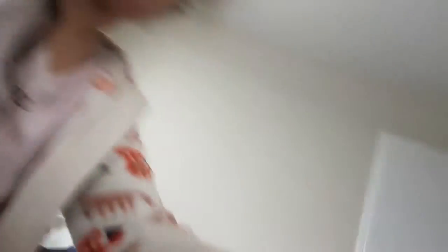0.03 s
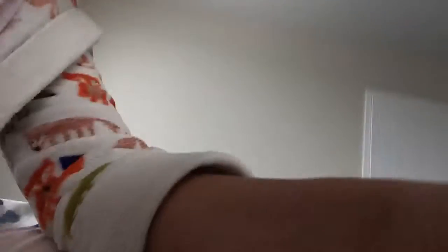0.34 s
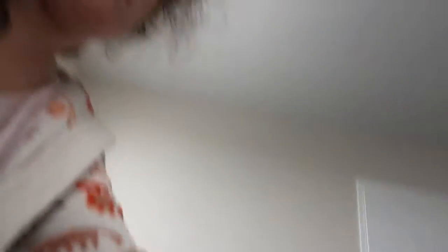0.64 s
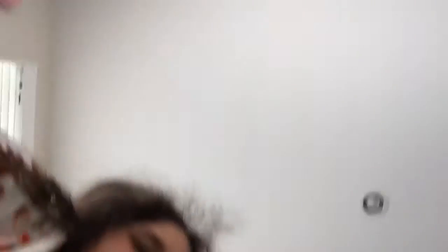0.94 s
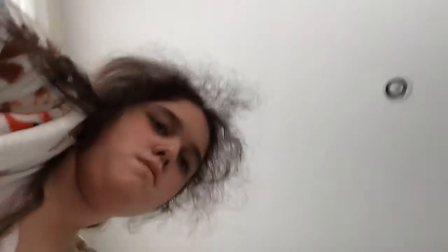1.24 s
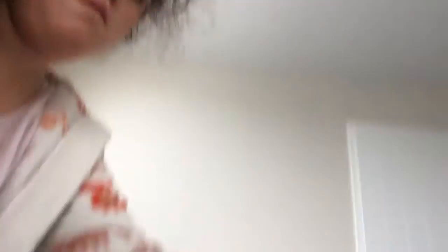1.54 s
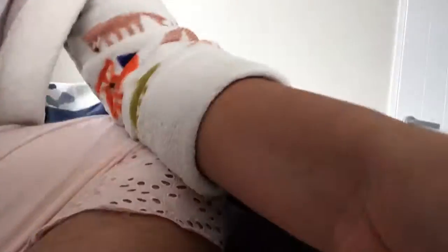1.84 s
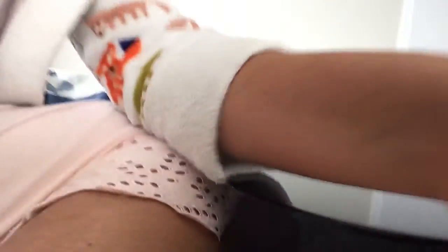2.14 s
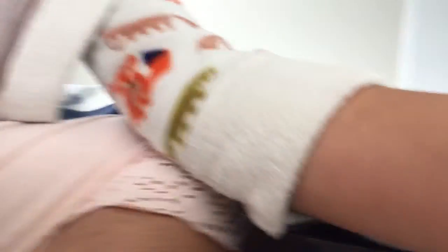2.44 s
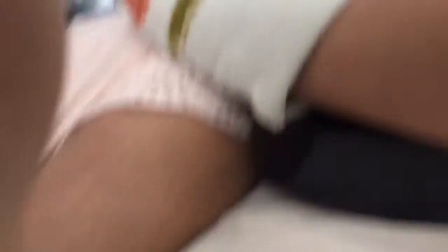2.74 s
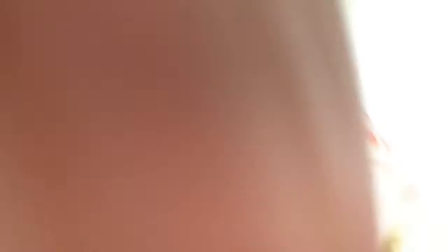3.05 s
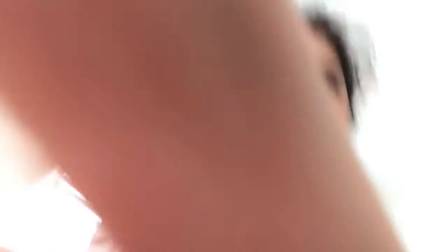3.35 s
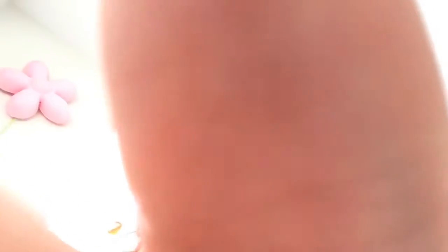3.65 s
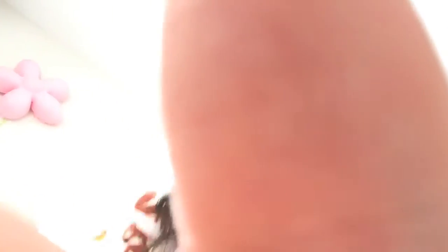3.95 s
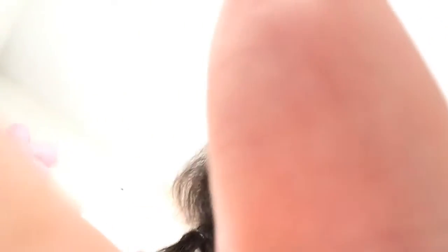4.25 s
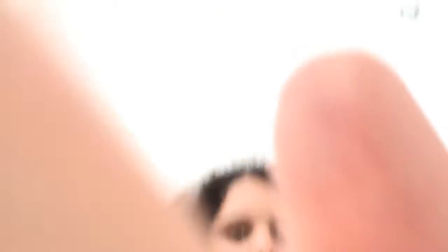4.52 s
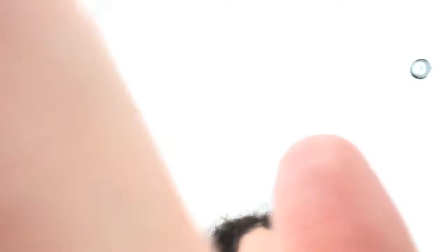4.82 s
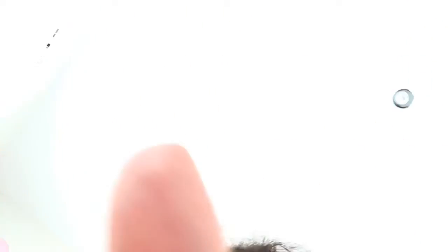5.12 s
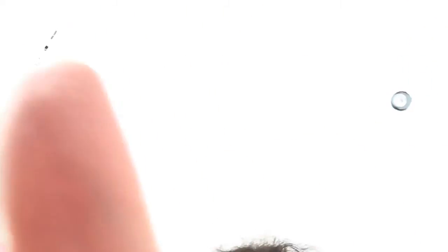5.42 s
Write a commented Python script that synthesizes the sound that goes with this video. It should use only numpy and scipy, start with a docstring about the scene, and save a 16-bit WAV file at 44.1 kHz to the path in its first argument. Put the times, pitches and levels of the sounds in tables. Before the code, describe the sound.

A handheld phone is shifted about indoors, with close rubbing, sharp finger knocks and a creaking run of low thumps.

```python
"""A phone is carried about a quiet room, gripped and shifted from hand to hand.
Cloth and skin rub over the case, and at 1 s a finger knocks hard right by the microphone: a tick that
falls into a low thump. From 2.7 s the hand takes a long slide, in which a fingertip sticks and slips
across the microphone port. A squeeze makes the case creak, catch by catch, up to a heavy knock at 4.7 s.
The grip loosens with dry ticks and a tumble of lighter knocks, and the hand gives a last rub."""
import sys
import numpy as np
from scipy import signal
from scipy.fft import rfft, irfft, next_fast_len
from scipy.io import wavfile
from scipy.ndimage import uniform_filter1d

SR = 44100
rng = np.random.default_rng(int(sys.argv[2]) if len(sys.argv) > 2 else 0)


def int16_out(signal):
    """Quantize to a 16-bit WAV file."""
    q = np.round(np.clip(np.atleast_2d(signal).T, -1, 1) * 32767)
    wavfile.write(sys.argv[1], SR, q.astype(np.int16))


N = 246078
TIME = np.arange(N) / SR

# tone of the still room: f/Hz, relative level/dB
ROOM_TONE_EQ = [(20, -11), (70, 17.5), (150, -4.5), (300, 3.5), (700, -32), (2000, -19), (5000, -33),
                (15000, -53)]
# the room's decay: f/Hz, t60/s
ROOM_DECAY = [(100, 0.083), (500, 0.12), (2000, 0.15), (10000, 0.16)]

# colours of the five rubbing layers: f/Hz, relative level/dB
RUMBLE_EQ = [(20, -23), (60, -2.5), (110, 2), (200, 0.5), (320, -6.5), (450, -10.5), (650, -22.5),
             (950, -33), (2500, -62)]  # body of the case
HOLLOW_EQ = [(150, -23.5), (300, -6), (520, -1.5), (680, 2), (950, -13.5), (1600, -45)]  # its hollow, excited by the rasp
RASP_EQ = [(300, -21.5), (750, -4.5), (1100, 5.5), (1600, 3.5), (2100, 3.5), (2800, -2.5), (4000, -13.5),
           (6000, -16), (12000, -40.5)]  # skin
HISS_EQ = [(1500, -28), (2900, 6.5), (3700, 4.5), (5000, 3.5), (7000, -1.5), (8800, -1), (10500, -10.5),
           (15000, -30)]  # cloth
SHEEN_EQ = [(6000, -27), (9000, 2), (11500, 1.5), (14500, 4.5), (16000, 0.5)]  # the cloth's fibres
# strokes of hand and sleeve: fastest t/s, rise/s, fall/s, rumble/dB, rasp/dB, hiss/dB, sheen/dB
HAND_STROKES = [(0.09, 0.27, 0.18, -69, -70, -71.5, -71), (0.207, 0.03, 0.019, -46, -65, -59.5, -69),
                (0.32, 0.13, .08, -46, -73.5, -72, -77), (0.385, .08, 0.11, -54, -63.5, -64, -69),
                (0.6, 0.21, 0.18, -63, -76.5, -79, -86), (0.76, 0.11, 0.087, -55, -74, -70.5, -76),
                (0.88, .1, 0.11, -51, -67.5, -65.5, -55), (0.986, 0.19, 0.047, -45, -54.5, -53, -53.5),
                (1.075, 0.069, 0.073, -55, -62, -70, -74), (1.299, .14, 0.11, -51, -64, -64.5, -66),
                (1.461, 0.11, 0.072, -56.5, -65, -67, -77), (1.518, 0.074, 0.1, -43.5, -57, -57, -62),
                (1.58, 0.059, 0.023, -41.5, -74.5, -71, -89.5), (1.779, 0.088, 0.15, -44, -63, -72.5, -85),
                (2.219, 0.3, 0.18, -52.5, -68.5, -65.5, -67), (2.4, 0.13, 0.12, -72, -71.5, -61.5, -61),
                (2.571, 0.089, 0.082, -45.5, -68, -71.5, -74.5), (3.82, 0.12, 0.051, -72.5, -67, -99, -90),
                (4.878, 0.045, 0.15, -49.5, -72, -73.5, -93), (5.16, 0.075, 0.11, -39, -62.5, -72.5, -82),
                (5.36, 0.42, 0.19, -54, -70, -76.5, -83), (5.57, 0.1, 0.19, -44.5, -72, -77.5, -75.5)]
# the hand's long slide and the squeeze after it: t/s, rumble/dB, rasp/dB, hiss/dB, sheen/dB
LONG_SLIDE = [(2.66, -76.5, -88, -86, -88), (2.745, -47.5, -54, -58.5, -55),
              (2.83, -31.5, -57.5, -63.5, -78), (2.98, -41.5, -52.5, -66, -87),
              (3.12, -42.5, -49.5, -55.5, -65), (3.29, -39, -61.5, -60.5, -66),
              (3.355, -46.5, -51, -52.5, -53), (3.495, -43, -56, -62.5, -80),
              (3.56, -53.5, -74, -84, -84.5), (3.82, -58, -86, -92, -86), (4.03, -50.5, -87, -101, -86),
              (4.12, -43, -64, -81, -80), (4.28, -39, -75.5, -80, -82), (4.39, -51, -66, -79, -80),
              (4.54, -36, -69, -75, -76), (4.655, -29, -51, -55, -65), (4.72, -35, -71, -77, -83),
              (4.81, -57.5, -90, -91, -109)]
# scrapes that sound a gap between hand and case: start/s, end/s, f/Hz, width/Hz, level/dB
GAP_SCRAPES = [(1.484, 1.556, 795, 170, -51), (3.065, 3.257, 1944, 260, -50),
               (3.358, 3.437, 1570, 160, -56)]

# resonances of the case: f/Hz, width/Hz, level/dB against the plain blow
CASE_MODES = [(285, 22, -16), (540, 21, -19), (713, 45, -5.5)]
# The levels of all touches below are gains on a unit impulse, ahead of the case and microphone.
# tiny dry ticks of cloth and fingernail: t/s, level/dB
LIGHT_FLICKS = [(0.546, -36.5), (0.827, -25), (0.997, -16), (1.035, -32), (1.921, -32), (2.0685, -30),
                (2.3181, -31.5), (4, -32), (4.8772, -31.5), (4.9041, -38), (5.5772, -26.5)]
# colour of a flick: f/Hz, level/dB
FLICK_EQ = [(20, -20), (120, 16.5), (550, 10.5), (1700, 1), (3800, -4), (7000, -13.5), (16000, -14.5)]
# slips of the fingertip over the port: t/s, level/dB
PORT_SLIPS = [(3.2488, 2), (3.274, 3), (3.287, 4.5), (3.3, -5), (3.307, 5), (3.321, -3.5), (3.3262, -7.5)]
# colour of a slip: f/Hz, level/dB
SLIP_EQ = [(20, -34), (55, 15), (100, 26), (200, 7.5), (600, 6.5), (1000, 0), (1700, 5.5), (2250, -2.5),
           (2750, -25), (5000, -19.5), (15000, -26)]
# soft bumps of the palm: t/s, thump f/Hz, thump/dB
PALM_BUMPS = [(0.067, 214, 4), (0.131, 149, 6), (0.4117, 119, 23.5), (1.231, 107, 11), (1.7839, 70, 29),
              (2.491, 143, 7.5), (2.5628, 123, 9.5), (2.7409, 87.5, 30.5), (3.139, 84.5, 19),
              (4.5945, 60, 29.5), (4.743, 59, 26.5), (4.786, 148, 4), (5.539, 74, 20.5)]
# catches of the case creaking under the grip: t/s, thump/dB, knock/dB, edge/dB
GRIP_CATCHES = [(0.0542, -3, -12, -45), (1.049, 0, -9, -30), (1.8897, -20, -19, -28), (3.549, -6, 1, -44),
                (3.5976, 12, -0.5, -10.5), (3.6221, 1, -0.5, -41), (3.6333, 1, -2, -26),
                (3.644, 9, -4, -35), (3.6648, 6, -7.5, -35), (3.704, 2, 2, -40), (3.7365, 9.5, -3, -36),
                (3.879, 9, 3.5, -30), (3.9387, 9.5, -18, -21), (3.9774, 13, 9, -36.5), (4.0374, 7, -2, -37),
                (4.0529, -4, -1, -25), (4.089, -7, -5, -42), (4.1059, 12, 9, -17), (4.1109, 11, -2, -14),
                (4.119, 15, -3.5, -15), (4.137, 26.5, 7.5, -25.5), (4.1647, 27, -0.5, -25),
                (4.1976, 30.5, -2.5, -24.5), (4.2258, 33, 15, -23.5), (4.2323, -7, 2, -29.5),
                (4.2564, 28.5, 6, -24.5), (4.2792, 32, -1, -22.5), (4.3516, 12.5, 7, -20.5),
                (4.3769, 17.5, 3, -22.5), (4.4113, 13.5, 2, -21.5), (4.4456, 13.5, -19, -20.5),
                (4.4555, 14, 3.5, -22), (4.4732, 8, 6.5, -24), (4.4817, 20, 5, -21), (4.5194, 13, 0, -22),
                (4.5563, 15, 9.5, -12.5), (4.5638, 25, -4.5, -9.5), (4.8317, 13, -14, -28)]
# knocks of fingers on the case: t/s, thump f/Hz, thump/dB, knock/dB, click/dB, tick/dB
FINGER_KNOCKS = [(0.3969, 100, 25.5, 6, -2.5, -24), (1.004, 160, 43, 28, -9.5, -50),
                 (1.008, 97, 50.5, 12.5, 9.5, -25), (1.344, 111, 19, -1.5, -16.5, -38),
                 (1.7463, 175, 12, -3.5, -21, -38.5), (1.7751, 60, 24, 13, -15.5, -36),
                 (2.6842, 136, 17.5, -15.5, -25, -39), (3.0069, 83.3, 18.5, 13, -1, -26),
                 (4.6685, 106.6, 43.5, 17, -7, -42), (4.6799, 40.2, 43, 8, 4, -30.5),
                 (4.976, 153, 31.5, 7, 2.5, -12), (4.9828, 110, 34.5, -13, -8, -21.5),
                 (5.028, 148, 31.5, 1, -14, -38), (5.0335, 62.4, 36.5, 4.5, -8.5, -20.5),
                 (5.0671, 132, 27, 2, -10, -24.5), (5.083, 107, 31, 10, -15, -40),
                 (5.118, 86.5, 33.5, 6, -8, -60), (5.1229, 81, 31.5, 6.5, -19, -22),
                 (5.135, 107, 25.5, 4, -27, -62), (5.149, 69, 25.5, -5, -13.5, -45)]
# the bands of a blow above its thump; the crack is the plastic's
KNOCK_HZ, CLICK_HZ, CRACK_HZ, TICK_HZ, TOP_HZ = 552, 1670, 3500, 7100, 16100


def amp(db):
    """Decibels to gain."""
    return 10 ** (np.asarray(db) / 20)


def unit_rms(x):
    """Scales to rms 1."""
    return x / np.sqrt(np.mean(x ** 2) + 1e-20)


def curve(points, hz):
    """Reads (f/Hz, value) points on a log-frequency axis."""
    f, value = np.transpose(points)
    return np.interp(np.log(hz + 1), np.log(f + 1), value)


def coloured(x, eq):
    """Shapes x with an EQ curve, at rms 1."""
    size = next_fast_len(N)
    gain = amp(curve(eq, np.fft.rfftfreq(size, 1 / SR)))
    return unit_rms(irfft(rfft(x, size) * gain, size)[:N])


def wander(rate_hz):
    """Smooth random modulation of rms 1, moving up to about the given rate."""
    lowpass = np.exp(-(np.fft.rfftfreq(N, 1 / SR) / rate_hz) ** 2)
    return unit_rms(irfft(rfft(rng.standard_normal(N)) * lowpass, N))


def room_tone(db=-64):
    """The still room: a steady bed of dark noise."""
    return amp(db) * coloured(rng.standard_normal(N), ROOM_TONE_EQ)


def room_reverb(x, wet_db=-35.5, size=256):
    """A faint diffuse tail, each band dying at its own speed."""
    hz, t, noise = signal.stft(rng.standard_normal(SR // 2), SR, nperseg=size)
    decay = np.exp(-np.log(1000) * t / curve(ROOM_DECAY, hz)[:, None])
    tail = signal.istft(noise * decay, SR, nperseg=size)[1]
    return amp(wet_db) * signal.fftconvolve(x, tail / np.linalg.norm(tail))[:N]


def loosening_ticks(start_s=4.71, end_s=5.2, ticks_per_s=38, db=-39):
    """The case gives off tiny dry ticks as the grip loosens."""
    ticks = (rng.random(N) < ticks_per_s / SR) * (TIME > start_s) * (TIME < end_s)
    treble = signal.butter(2, [4200, 8500], "bandpass", fs=SR, output="sos")
    return signal.sosfilt(treble, amp(db) * ticks)


def scrapes():
    """Friction noise swells and fades in the narrow resonance of a gap between hand and case."""
    out = np.zeros(N)
    for start, end, hz, width, db in GAP_SCRAPES:
        peak = [(hz / 2, -50), (hz - width, -16), (hz, 0), (hz + width, -16), (hz * 2, -50)]
        swell = np.sin(np.pi * np.clip((TIME - start) / (end - start), 0, 1))
        out += amp(db) * swell * coloured(rng.standard_normal(N), peak)
    return out


def rub_envelopes(drop_db=18, rounding=1.12):
    """Gains of rumble, rasp, hiss and sheen: strokes speed up and slow down on top of the long slide."""
    t = np.arange(0, N / SR, .002)
    times, *slide = np.transpose(LONG_SLIDE)
    power = amp([np.interp(t, times, db, left=-np.inf, right=-np.inf) for db in slide]) ** 2
    for fastest, rise, fall, *levels in HAND_STROKES:
        away = np.maximum((fastest - t) / rise, (t - fastest) / fall)  # 0 at the peak, 1 at either end
        power += amp(np.array(levels)[:, None] - drop_db * away ** rounding) ** 2
    return [np.interp(TIME, t, np.sqrt(layer)) for layer in power]


def friction(eq, rough_db, rough_hz, grain_mix, grains_per_s, patchy_db, size=1024):
    """Countless tiny catches merge into a wash whose colour shifts; some stand out as grains."""
    _, _, noise = signal.stft(rng.standard_normal(N), SR, nperseg=size)
    patches = uniform_filter1d(rng.standard_normal(noise.shape), size=7, axis=0)  # smooth in frequency
    patches = unit_rms(uniform_filter1d(patches, size=6, axis=1))  # and in time
    wash = signal.istft(noise * amp(patchy_db * patches), SR, nperseg=size)[1][:N]
    wash *= amp(rough_db * wander(rough_hz))
    grains = rng.standard_normal(N) * (rng.random(N) < grains_per_s / SR)
    return coloured(unit_rms(wash) + grain_mix * unit_rms(grains), eq)


def rubbing(hollow_db=4):
    """Skin and sleeve slide over the case: five layers of friction, from rumble up to sheen."""
    weight, skin, cloth, fibres = rub_envelopes()
    rumble = friction(RUMBLE_EQ, rough_db=3.5, rough_hz=25, grain_mix=.25, grains_per_s=100, patchy_db=5)
    hollow = friction(HOLLOW_EQ, rough_db=3, rough_hz=30, grain_mix=.39, grains_per_s=150, patchy_db=4.5)
    rasp = friction(RASP_EQ, rough_db=3, rough_hz=70, grain_mix=.53, grains_per_s=41, patchy_db=1.56)
    hiss = friction(HISS_EQ, rough_db=2, rough_hz=60, grain_mix=.3, grains_per_s=1200, patchy_db=3)
    sheen = friction(SHEEN_EQ, rough_db=3, rough_hz=60, grain_mix=.15, grains_per_s=1200, patchy_db=-2)
    return weight * rumble + skin * (amp(hollow_db) * hollow + rasp) + cloth * hiss + fibres * sheen


def case_ring(x):
    """The small plastic shell rings briefly with whatever strikes it."""
    return x + sum(amp(db) * signal.lfilter(*signal.iirpeak(hz, hz / width, fs=SR), x)
                   for hz, width, db in CASE_MODES)


def downward_sweep(x, lag_cycles=.9):
    """Case and microphone cut the sub-bass and delay each frequency by almost a cycle, so blows fall."""
    size = next_fast_len(N + SR)
    hz = np.fft.rfftfreq(size, 1 / SR)
    lag = np.exp(-2j * np.pi * lag_cycles * np.log((hz + 20) / 105))
    bass_cut = signal.butter(2, 45, "highpass", fs=SR, output="sos")
    return signal.sosfilt(bass_cut, irfft(rfft(x, size) * lag, size)[:N])


def add(mix, s, sound):
    """Mixes in a sound centred on time s."""
    start = round(s * SR) - len(sound) // 2
    sound = sound[max(-start, 0):]
    part = mix[max(start, 0):][:len(sound)]
    part += sound[:len(part)]


def contact(eq, grit_hz, grit_s, uneven_db, halo, halo_s, size=8192, spot_points=24):
    """One touch: a clean bass push; above grit_hz a scrunch, a faint halo of hiss before and after."""
    t, hz = (np.arange(size) - size // 2) / SR, np.fft.rfftfreq(size, 1 / SR)
    envelope = np.exp(-abs(t) / grit_s) + halo * np.exp(-abs(t) / halo_s)
    scrunch = rng.standard_normal(size) * envelope
    grit_share = hz ** 2 / (hz ** 2 + grit_hz ** 2)
    push = np.sqrt(1 - grit_share) * rfft(t == 0)
    grit = np.sqrt(grit_share) * rfft(scrunch / np.linalg.norm(scrunch))
    # each spot on the case has its own colour
    ripple = np.pad(rng.standard_normal(spot_points - 2), 1)
    spot = np.column_stack([np.geomspace(280, 6000, spot_points), ripple])
    return irfft((push + grit) * amp(curve(eq, hz) + uneven_db * curve(spot, hz)))


def flicks():
    """Cloth and fingernail catch the case lightly."""
    out = np.zeros(N)
    for s, db in LIGHT_FLICKS:
        flick = contact(FLICK_EQ, grit_hz=2000, grit_s=.00072, uneven_db=.5, halo=.06, halo_s=.006)
        add(out, s, amp(db) * flick)
    return out


def slips():
    """The fingertip lets go in a quick stutter, each slip sounding the port's cavity."""
    out = np.zeros(N)
    for s, db in PORT_SLIPS:
        slip = contact(SLIP_EQ, grit_hz=900, grit_s=.001, uneven_db=-1, halo=.12, halo_s=.0081)
        add(out, s, amp(db) * slip)
    return out


def blow(hz, thump, knock, click, tick, halo, halo_s, crack_db):
    """A thump at hz, with as much treble as the touch is hard; band levels in dB."""
    low = [(5, thump - 60), (hz / 4, thump - 22), (hz / 1.7, thump - 5.5),
           (hz, thump), (hz * 1.398, thump - 4)]
    crack = (click + tick) / 2 + crack_db
    high = [(KNOCK_HZ, knock), (CLICK_HZ, click), (CRACK_HZ, crack), (TICK_HZ, tick), (TOP_HZ, tick - 2)]
    return contact(low + high, grit_hz=2370, grit_s=.0011, uneven_db=2, halo=halo, halo_s=halo_s)


def bumps():
    """The soft palm meets the case: all thump, hardly any treble."""
    out = np.zeros(N)
    for s, hz, thump in PALM_BUMPS:
        bump = blow(hz, thump, knock=-19.5, click=-32.5, tick=-55, halo=.17, halo_s=.008, crack_db=-2)
        add(out, s, bump)
    return out


def catches(hz_at_0_db=128, db_per_octave=54.5):
    """The gripped case creaks in gritty catches; a harder push bends more of it and thumps lower."""
    out = np.zeros(N)
    for s, thump, knock, edge in GRIP_CATCHES:
        hz = hz_at_0_db * 2 ** (-thump / db_per_octave)
        click = edge + .26 * (knock - edge) + 5
        add(out, s, blow(hz, thump, knock, click, tick=edge - 18, halo=.09, halo_s=.018, crack_db=4))
    return out


def knocks():
    """Fingers strike the case right by the microphone, dry and tight."""
    out = np.zeros(N)
    for s, hz, thump, knock, click, tick in FINGER_KNOCKS:
        add(out, s, blow(hz, thump, knock, click, tick, halo=.05, halo_s=.005, crack_db=.8))
    return out


def scene():
    """Close-up blows and rubbing over the room tone, in mono."""
    strikes = knocks() + bumps() + catches() + flicks()
    blows = downward_sweep(case_ring(strikes) + slips())
    background = room_tone() + room_reverb(blows)
    return (background + rubbing() + scrapes() + loosening_ticks() + blows)[None]


def record(dry):
    """The hardest thump overloads the input into a soft clip; a steep low-pass trims the top."""
    clipped = dry / (1 + dry ** 8) ** (1 / 8)
    lowpass = signal.firwin(401, TOP_HZ, window=("kaiser", 8), fs=SR)
    return signal.oaconvolve(clipped, lowpass[None], "same")


dry = scene()
out = record(dry)
int16_out(out)
```